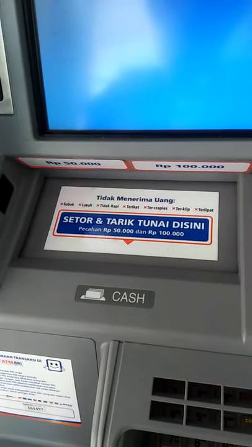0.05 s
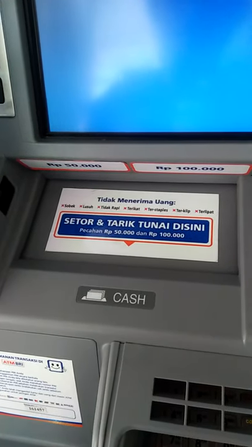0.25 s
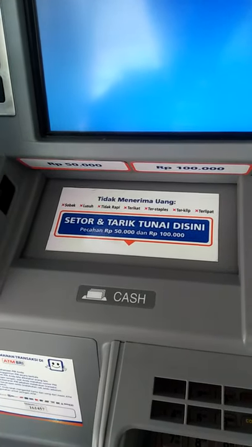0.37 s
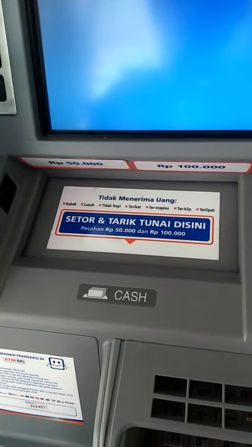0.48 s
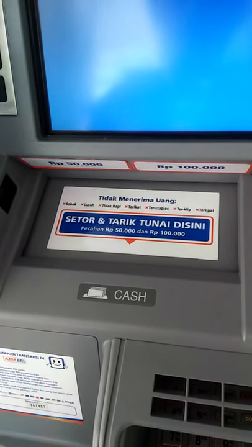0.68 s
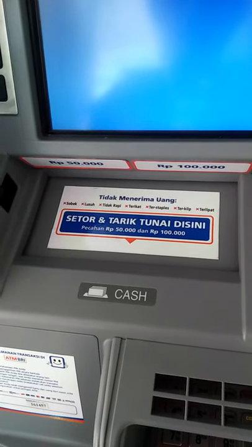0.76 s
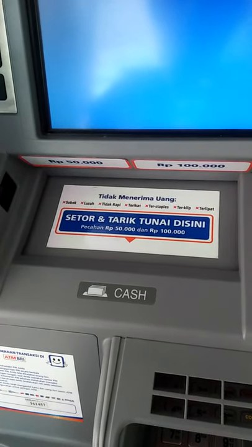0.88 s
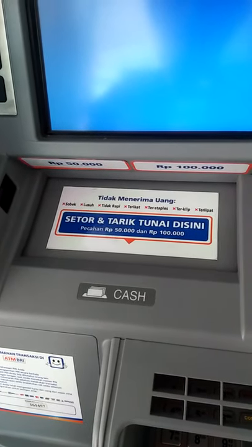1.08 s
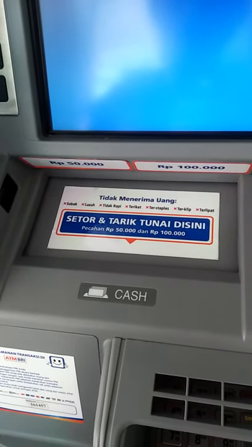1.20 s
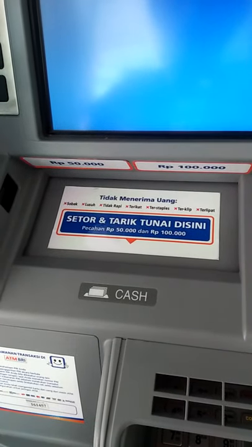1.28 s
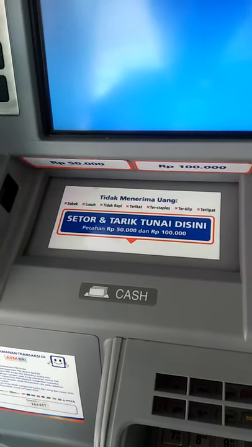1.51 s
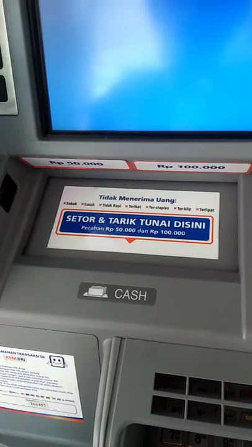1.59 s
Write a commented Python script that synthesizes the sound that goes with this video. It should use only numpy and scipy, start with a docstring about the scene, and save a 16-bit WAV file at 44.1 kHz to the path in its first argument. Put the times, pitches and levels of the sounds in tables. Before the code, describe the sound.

A cash machine's mechanism whirrs and rattles briefly, then gives a few sharp clacks.

```python
"""A small hard booth, close to a cash machine. Fans, mains hum and cabinet resonances form the background.
A drive runs for under a second: a stepper motor whines at harmonics of its step rate, rollers whirr, and
the tooth impacts of the gear train rattle, harder once in every turn. Then latches clack, exciting the
housing, and a quiet second drive starts. Loose parts squeak in narrow resonances, and reflections add a
short tail to the gears, rollers, latches and squeaks."""
import sys
import numpy as np
from scipy import signal
from scipy.fft import rfft, irfft
from scipy.io import wavfile
from scipy.ndimage import uniform_filter1d

SR = 44100
rng = np.random.default_rng(int(sys.argv[2]) if len(sys.argv) > 2 else 0)


def wav_out(sig):
    """Save sig, one row per channel (or a flat mono array), as 16-bit PCM at SR to the path in sys.argv[1]."""
    wavfile.write(sys.argv[1], SR, np.round(np.clip(np.atleast_2d(sig).T, -1, 1) * 32767).astype(np.int16))


N = 72765

ENGAGE_S, ENGAGE_RISE_S = 0.2248, 0.0039  # the jolt as the main drive engages
RUN_S, STOP_S, SPIN_UP_S = 0.289, 0.96, 0.06


def undb(db):
    """Amplitude ratio of a level in decibels."""
    return 10 ** (np.asarray(db) / 20)


def unit(x):
    """Normalisation to an rms of 1."""
    return x / np.sqrt(np.mean(x ** 2))


def clock():
    """Time of each sample in seconds."""
    return np.arange(N) / SR


def walk(rate_hz):
    """Smoothed random steps: a slow fluctuation with a spread near 1."""
    hold = int(SR / rate_hz)
    steps = np.repeat(rng.standard_normal(N // hold + 1), hold)
    return 1.3 * uniform_filter1d(uniform_filter1d(steps, hold), hold)[:N]


def convolve(x, response):
    """Output of a linear system with the given impulse response."""
    return signal.fftconvolve(x, response)[:N]


def colour(x, spectrum, size=4096):
    """Minimum-phase filter through (frequency [Hz], level [dB]) points; white noise keeps its power."""
    hz, db = np.array(spectrum, float).T
    bins_hz = np.arange(size // 2 + 1) * SR / size
    gain = unit(undb(np.interp(np.log(bins_hz + 1), np.log(hz), db)))
    cepstrum = irfft(np.log(gain))
    cepstrum[1:size // 2] *= 2  # folding onto positive time makes the filter causal
    cepstrum[size // 2 + 1:] = 0
    return convolve(x, irfft(np.exp(rfft(cepstrum))))


def ring(x, hz, width_hz):
    """Response of a damped oscillator; white noise keeps its power."""
    response = np.exp(-np.pi * width_hz * clock()) * np.sin(2 * np.pi * hz * clock())
    return convolve(x, response / np.linalg.norm(response))


def band(hz, width_hz):
    """Narrow-band noise of rms 1 from two resonators in cascade."""
    return unit(ring(ring(rng.standard_normal(N), hz, width_hz), hz, width_hz))


def tone(hz, db):
    """Simple harmonic motion at a given rms level, with random phase."""
    return np.sqrt(2) * undb(db) * np.sin(2 * np.pi * (hz * clock() + rng.random()))


def burst(peak_s, rise_s, fall_s):
    """Transient envelope: exponential growth to a peak, then exponential decay."""
    t = clock() - peak_s
    return np.exp(np.minimum(t / rise_s, -t / fall_s))


def gate(start_s, stop_s, rise_s, fall_s):
    """Sustained envelope: linear rise, hold, exponential decay."""
    t = clock()
    return np.clip((t - start_s) / rise_s, 0, 1) * np.exp(-np.maximum(t - stop_s, 0) / fall_s)


def contacts(per_s=3000, scatter_db=3.5):
    """Shot noise: dense tiny impacts at random times and of uneven strength."""
    hits = rng.random(N) < per_s / SR
    polarity = np.sign(rng.standard_normal(N))
    strength = undb(scatter_db * np.clip(rng.standard_normal(N), -2, 2))
    return unit(hits * polarity * strength)


def background(fans_db=-58.5):
    """Superposition of broadband fan noise, wavering hum and the cabinet's droning resonances."""
    # fan noise spectrum: (frequency [Hz], relative level [dB])
    fan_spectrum = [(20, -30), (45, 3), (65, -3.5), (105, -6), (185, -8.5), (235, -20), (300, 7),
                    (372, -15), (450, 0), (640, -7), (760, 6), (840, -9), (950, 1), (1150, -14), (1450, -7),
                    (1900, -14.5), (2600, -27.5), (4000, -36.5), (14000, -43)]
    # hum lines: (frequency [Hz], level [dB], waver [dB])
    hum_lines = [(48, -75, 7), (911.5, -66.5, 1.5)]
    # cabinet resonances: (frequency [Hz], bandwidth [Hz], level [dB], start [s], stop [s])
    drones = [(457.7, 47, -55.5, 0.075, 0.6), (451, 28, -65, 0.65, 1.7), (288, 40, -59, 0.18, 0.25),
              (317, 38, -60.5, 1.23, 1.7), (770, 50, -96, 0.51, 1.7), (937, 110, -56.5, 0.12, 0.26)]
    out = undb(fans_db) * colour(rng.standard_normal(N), fan_spectrum)
    out += sum(tone(hz, db + waver * walk(rate_hz=14)) for hz, db, waver in hum_lines)
    for hz, width, db, start, stop in drones:
        out += undb(db) * gate(start, stop, rise_s=0.034, fall_s=0.084) * band(hz, width)
    return out


def booth(x, t60_s=0.23, tail_db=-4.5, gap_s=0.003):
    """Reverberation: reflections in the cabinet and booth form a short, exponentially decaying tail."""
    t = clock()
    tail = rng.standard_normal(N) * np.exp(-np.log(1000) * t / t60_s) * (t > gap_s)
    reflected = undb(tail_db) * convolve(x, tail / np.linalg.norm(tail))
    return (x + reflected) / np.hypot(1, undb(tail_db))


def second_drive(start_s=1.218, whirr_db=-67):
    """A quiet drive deeper inside starts among the clacks: broadband whirr plus narrow-band whine."""
    # whirr spectrum: (frequency [Hz], relative level [dB])
    whirr_spectrum = [(300, -24), (800, -15), (990, 18.5), (1150, -23), (1400, 1), (2000, -1), (2300, -8),
                      (5000, -5), (14000, -3)]
    # whine bands: (frequency [Hz], bandwidth [Hz], level [dB])
    whine_bands = [(1980, 14, -74), (3010, 19, -77), (8670, 410, -66), (11450, 400, -74)]
    whirr = undb(whirr_db) * colour(rng.standard_normal(N), whirr_spectrum)
    whine = sum(undb(db) * band(hz, width) for hz, width, db in whine_bands)
    return (whirr + whine) * np.clip((clock() - start_s) / SPIN_UP_S, 0, 1)


def squeaks(rise_s=0.0046):
    """Resonance of loose parts, and one latch ringing on: each sings briefly in one narrow band."""
    # loose parts, plus a latch ringing at 1.13 s: (time [s], frequency [Hz], bandwidth [Hz], level [dB], decay
    # time [s])
    parts = [(.248, 1954, 220, -49, 0.021), (0.449, 2100, 160, -44.5, 0.026), (1.13, 6310, 490, -42, 0.006),
             (1.154, 2860, 200, -63, 0.014), (1.27, 2910, 270, -57.5, 0.0099),
             (1.296, 4330, 350, -63, 0.0079), (1.383, 2900, 405, -54.5, 0.0093),
             (1.387, 4970, 300, -56, .01), (1.402, 1283, 70, -51, 0.007)]
    return sum(undb(db) * burst(s, rise_s, fall) * band(hz, width) for s, hz, width, db, fall in parts)


def latches(knock_lag_s=0.0085):
    """Impact excitation: each latch chatters and rings; the housing answers later with a softer knock."""
    # clacks: (time [s], level [dB], ring frequency [Hz], relative ring [dB], relative knock [dB])
    clacks = [(1.12, -58, 6400, -7, -24), (1.1273, -38, 7100, -11, -17.5), (1.264, -45.5, 8220, 0.5, -11.5),
              (1.293, -39.5, 10830, -4, -19), (1.381, -41.5, 8720, -0.5, -13),
              (1.534, -45, 10700, -12.5, -27.5)]
    # latch chatter spectrum: (frequency [Hz], relative level [dB])
    latch_spectrum = [(1000, -59), (5200, -26), (6200, -1), (7600, 0), (9000, 9), (10200, 8.5), (12000, -7),
                      (14200, -12)]
    # housing response: (frequency [Hz], relative level [dB])
    housing_spectrum = [(200, -14), (800, -16), (1400, -1), (2200, 5), (2900, 1.5), (3700, 2.5),
                        (4700, 7.5), (6000, -6), (12000, -24.5)]
    out = np.zeros(N)
    for s, db, hz, ring_db, knock_db in clacks:
        latch = colour(rng.standard_normal(N), latch_spectrum) + undb(ring_db) * band(hz, width_hz=800)
        latch *= burst(s, rise_s=0.0024, fall_s=0.01)
        knock = undb(knock_db) * colour(rng.standard_normal(N), housing_spectrum)
        knock *= burst(s + knock_lag_s, rise_s=0.0032, fall_s=0.021)
        out += undb(db) * (latch + knock)
    return out


def rollers(level_db=-44.5):
    """Rolling contact noise: a dull whirr that surges as the drive engages."""
    # roller whirr spectrum: (frequency [Hz], relative level [dB])
    whirr_spectrum = [(60, -20), (115, -5), (185, -4), (235, -22), (370, -7.5), (560, -1), (740, 8.5),
                      (850, -6.5), (1100, -9), (1600, -6.5), (2100, 1), (2700, 1.5), (3300, -7), (7000, -4),
                      (14000, -9.5)]
    running = gate(RUN_S, STOP_S, rise_s=0.013, fall_s=0.052)
    jolt = undb(4.5) * burst(ENGAGE_S, ENGAGE_RISE_S, fall_s=0.043)
    return undb(level_db) * colour(contacts() * (running + jolt), whirr_spectrum)


def stepper_motor(step_hz=699.9, wobble=0.0007, flutter_db=0.9):
    """Periodic stepping radiates harmonics of the step rate, which flutter a little under load."""
    # whine harmonics: (multiple of the step rate [1], level [dB])
    harmonics = [(1, -44.3), (2, -57.5)]
    step_rate = step_hz * (1 + wobble * walk(rate_hz=39.7))
    phase = 2 * np.pi * np.cumsum(step_rate) / SR
    whine = sum(undb(db + flutter_db * walk(rate_hz=46.75)) * np.sin(k * phase) for k, db in harmonics)
    return np.sqrt(2) * whine * gate(RUN_S, stop_s=0.99, rise_s=SPIN_UP_S, fall_s=0.017)


def tooth_pings(per_s=400, low_hz=8215, high_hz=10796, fall_s=0.0028, size=1024):
    """Free vibration of struck teeth: a shower of damped sinusoids, each at its own pitch."""
    t = np.arange(size) / SR
    out = np.zeros(N + size)
    for when, pitch, strength in rng.random((int(per_s * N / SR), 3)):
        hz = low_hz + pitch * (high_hz - low_hz)
        onset = int(when * N)
        out[onset:onset + size] += (0.5 + strength) * np.sin(2 * np.pi * hz * t) * np.exp(-t / fall_s)
    return unit(out[:N])


def gears(mesh_db=-38.5, engage_db=-24.5, ping_db=-0.5):
    """Impact noise of gear teeth: steady meshing, the engaging jolt and a scrape a turn add in power."""
    # one scrape for each turn of the gears: (time [s], level [dB])
    turns = [(0.297, -29), (.342, -40), (0.395, -32), (0.443, -29.5), (0.492, -28.5), (.540, -29.5),
             (.587, -27.5), (0.634, -30), (.678, -24.5), (0.728, -29), (0.776, -30.5), (.818, -30.5),
             (0.873, -26.5), (.920, -30), (0.968, -27.5)]
    # teeth that catch and snap: (time [s], level [dB])
    catches = [(0.5867, -23), (.592, -29), (.652, -27), (.682, -27), (0.818, -30)]
    # soft sliding of the mechanism: (start [s], stop [s], level [dB])
    slides = [(0.114, .21, -77.5), (1.004, 1.12, -65), (1.118, 1.26, -69), (1.313, 1.7, -68)]
    # rattle spectrum: (frequency [Hz], relative level [dB])
    rattle_spectrum = [(300, -44), (1500, -20.5), (2400, -21.5), (3500, -18.5), (7200, -17.5), (8300, 2.5),
                       (9500, -3.5), (10600, -4.5), (12000, -8.5), (14200, -13)]
    power = (undb(mesh_db) * gate(RUN_S, STOP_S, rise_s=0.03, fall_s=0.005)) ** 2
    power += (undb(engage_db) * burst(ENGAGE_S, ENGAGE_RISE_S, fall_s=0.0059)) ** 2
    power += sum((undb(db) * burst(s, rise_s=0.0056, fall_s=0.0075)) ** 2 for s, db in turns)
    meshing = np.sqrt(power)
    sliding = sum(undb(db) * gate(start, stop, rise_s=0.0083, fall_s=0.02) for start, stop, db in slides)
    snapping = sum(undb(db) * burst(s, rise_s=0.00085, fall_s=0.0017) for s, db in catches)
    rattle = colour(contacts() * (meshing + sliding), rattle_spectrum)
    snaps = snapping * band(hz=9230, width_hz=2400)
    pings = undb(ping_db) * meshing * tooth_pings()
    return (rattle + snaps + pings) / np.hypot(1, undb(ping_db))


def scene(width=0.44, width_from_hz=4660, width_full_hz=8200):
    """Decorrelation: rattle, whirr, clacks and squeaks sound slightly wide in the treble;
    the motor, second drive and background stay centred."""
    first, second = (booth(gears() + rollers() + latches() + squeaks()) / np.sqrt(2) for _ in range(2))
    bins_hz = np.arange(N // 2 + 1) * SR / N
    spread = width * np.interp(bins_hz, [width_from_hz, width_full_hz], [0, 1])
    side = irfft(rfft(first - second) * spread, N)
    mid = first + second + stepper_motor() + second_drive() + background()
    return np.array([mid + side, mid - side])


def record(dry, top_hz=14200):
    """Band limiting: a steep elliptic low-pass removes the highest treble."""
    return signal.sosfilt(signal.ellip(10, 0.2, 80, top_hz, fs=SR, output="sos"), dry)


dry = scene()
out = record(dry)
wav_out(out)
```